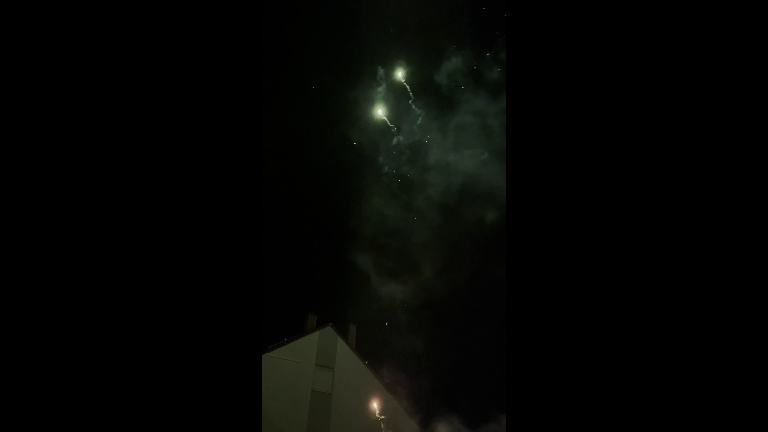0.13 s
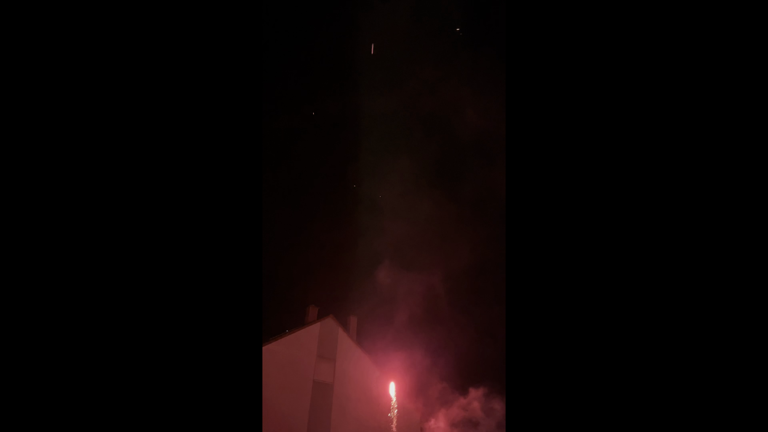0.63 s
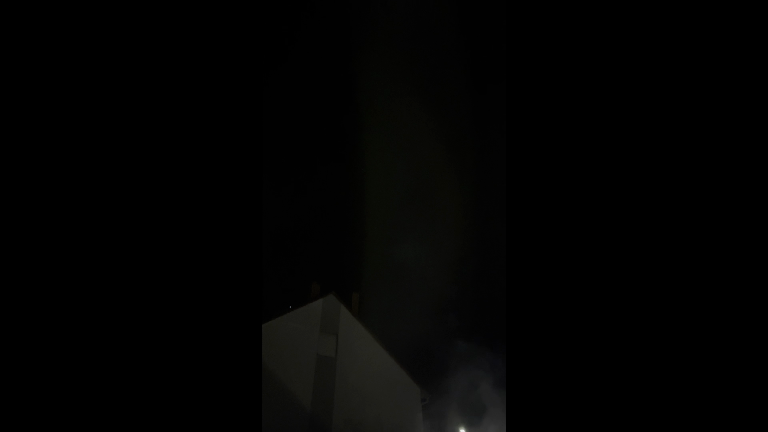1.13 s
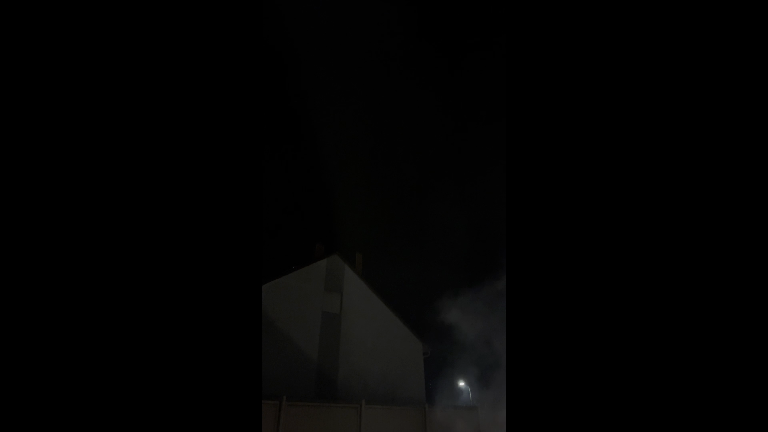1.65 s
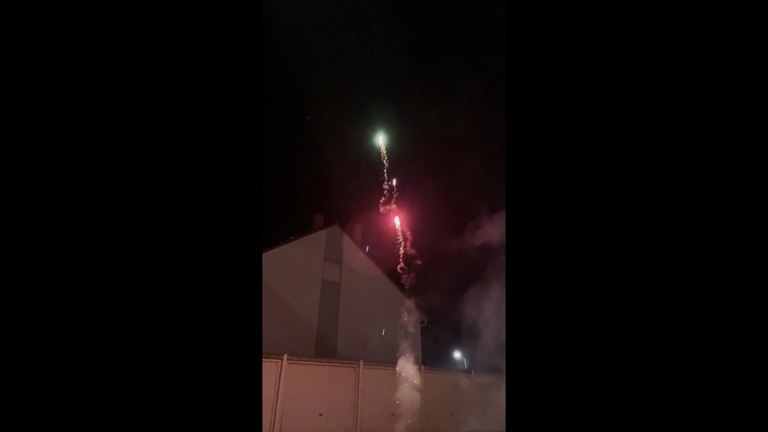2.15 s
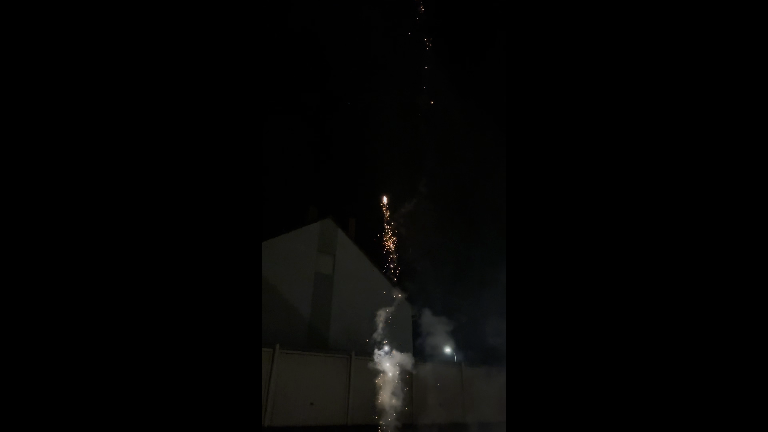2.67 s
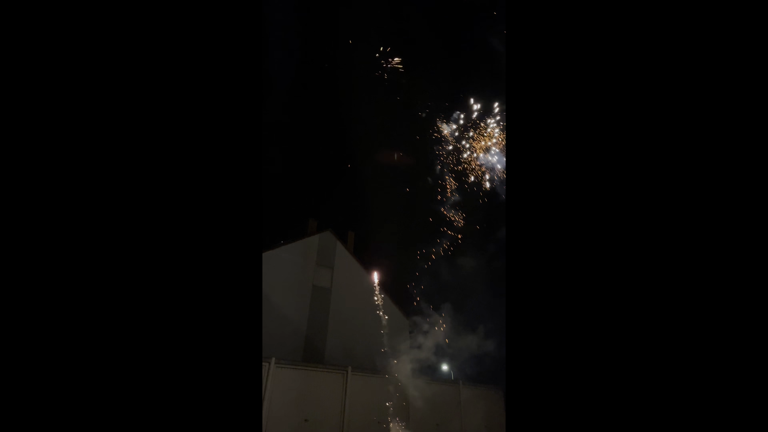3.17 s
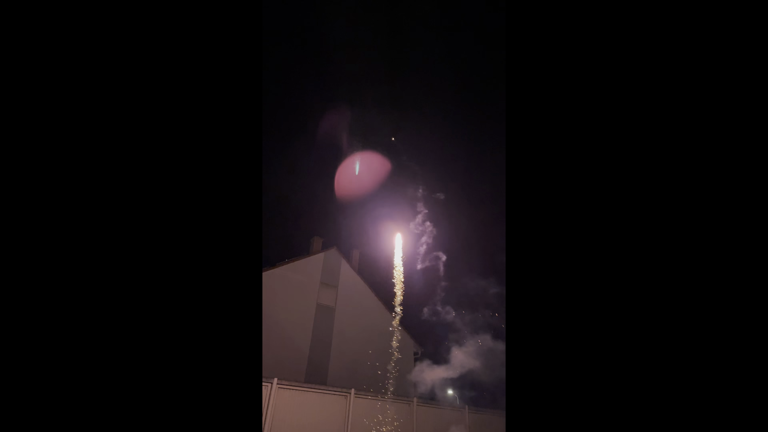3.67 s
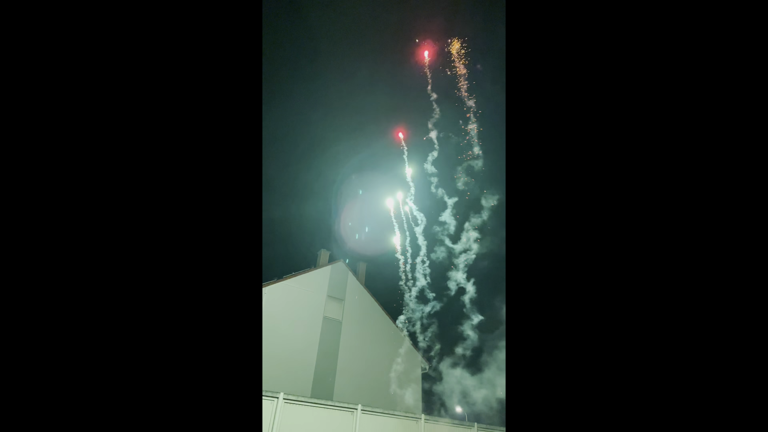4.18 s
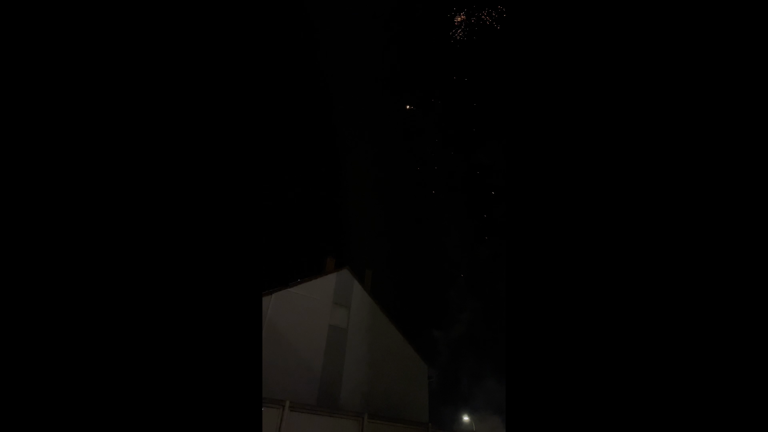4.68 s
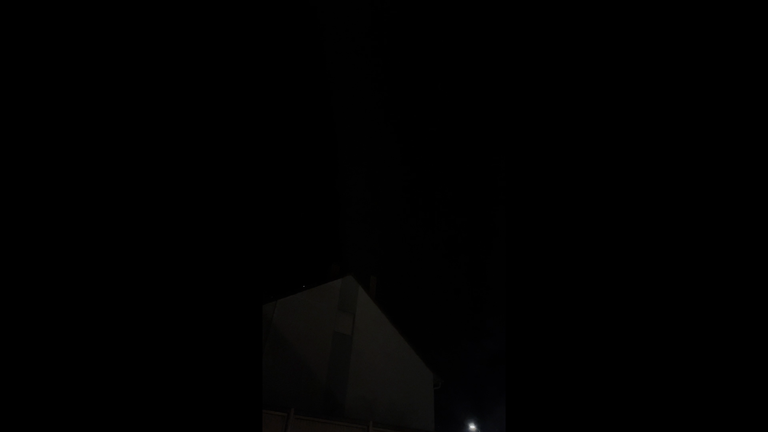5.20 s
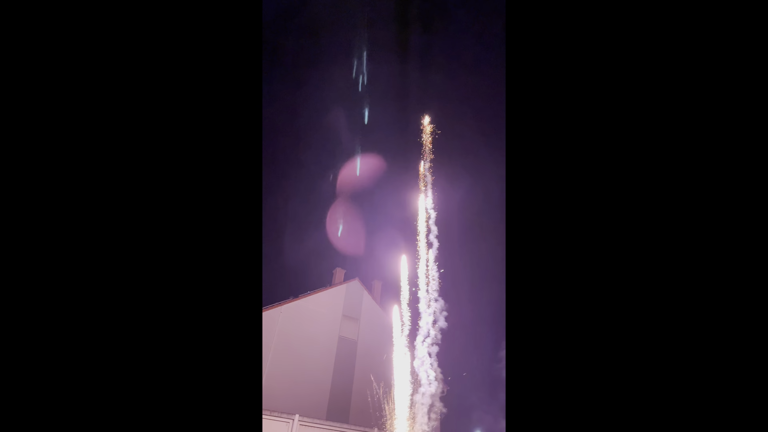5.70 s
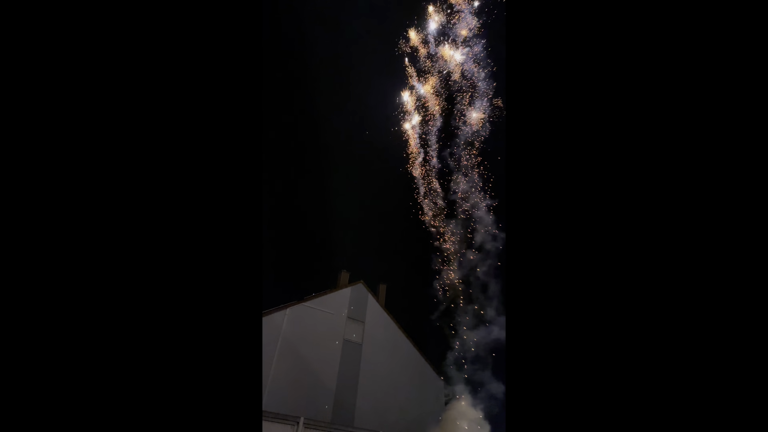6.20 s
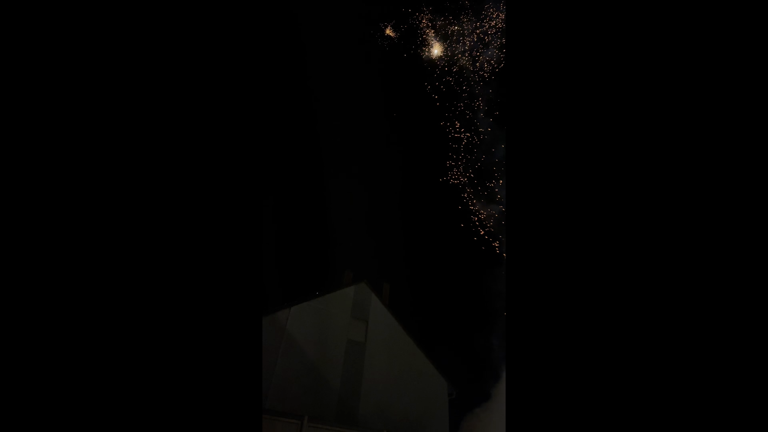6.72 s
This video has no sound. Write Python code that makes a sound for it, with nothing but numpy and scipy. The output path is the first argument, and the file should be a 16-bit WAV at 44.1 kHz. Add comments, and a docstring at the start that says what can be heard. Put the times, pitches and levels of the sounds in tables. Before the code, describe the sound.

Outdoors, fireworks bang from close tubes, boom overhead with rolling echoes, and snap into bright crackles, ending in a fast volley and thick crackling shower.

```python
"""Firework battery in a yard at night

Lift charges bang out of cardboard tubes, shells boom far overhead and roll away, stars burst into sharp crackles.
Bangs and crackles are short pulses in puffs of noise; rolls, hiss and sizzle are shaped noise beds.
Nearby hard surfaces echo the tube shots, low bursts and stars; scattered yard reflections follow every blast.
A phone with two spaced microphone ports listens."""
import sys
import numpy as np
from scipy import signal
from scipy.fft import rfft, irfft, next_fast_len
from scipy.io import wavfile
from scipy.ndimage import map_coordinates

SR = 44100
rng = np.random.default_rng(int(sys.argv[2]) if len(sys.argv) > 2 else 0)


def ratio(d):
    """dB to gain"""
    e = np.asarray(d, float) / 20
    return 10 ** e


def store_wav(level_fs):
    """Save 16-bit WAV to argv[1]."""
    pcm = np.round(np.clip(np.atleast_2d(level_fs), -1, 1) * 32767)
    wavfile.write(sys.argv[1], SR, pcm.T.astype(np.int16))


N = 301644

# spectrum of the sharp crack of a burst or wide tube: pitch_hz, level_db
CRACK_SPECTRUM = [(900, -12), (1500, -1), (3200, 0), (4300, -9), (6000, -26)]
# spectrum of the spray of hot gas: pitch_hz, level_db
FIZZ_SPECTRUM = [(2000, -2), (3700, -7), (5500, -12), (8000, -10), (10700, -8), (12500, -18), (16500, -42)]
# spectrum of the dull body of a blast: pitch_hz, level_db
THUD_SPECTRUM = [(420, -18), (750, 0), (1400, -6)]
# hard surfaces that answer stars and low bursts: delay_s, level_db, bass_limit_hz, treble_limit_hz
STAR_REFLECTIONS = [(.0033, -3, 350, 7000), (.017, -12, 1500, 9000), (.066, -15, 600, 7000)]

NEAR_RISE_S = 0.0009
FAR_RISE_S, FAR_STRETCH = 0.002, 3.5  # distance blurs the attack and lengthens the puff


def unit(x):
    """Scaled to rms 1."""
    return x / np.sqrt(np.mean(x ** 2) + 1e-20)


def along(points, hz):
    """(Hz, value) points read on a log frequency axis."""
    f, v = np.transpose(points)
    return np.interp(np.log(hz + 1), np.log(f + 1), v)


def wobble(rate):
    """A smooth random curve, rate knots a second."""
    knots = rng.standard_normal(int(N * rate / SR) + 4)
    return map_coordinates(knots, [np.arange(N) * rate / SR])


def filtered(x, response):
    """x passed through a complex response of frequency."""
    m = next_fast_len(N + SR // 2)
    return irfft(rfft(x, m) * response(np.fft.rfftfreq(m, 1 / SR)), m)[..., :N]


def colour(spectrum, hz):
    """Gain of a spectrum that keeps falling beyond its ends."""
    return ratio(along([(1, -90), *spectrum, (SR / 2, -90)], hz))


def paired(noise, gain):
    """Two noises mixed into left and right, partly alike in both ears, and scaled to rms 1."""
    # likeness of the two ears: pitch_hz, correlation (0 to 1)
    likeness = [(60, 0.36), (280, 0.95), (700, 0.33), (1400, 0.99), (3500, 0.048), (9000, 1), (13000, 1)]

    def turn(hz):
        return np.arccos(np.clip(along(likeness, hz), -1, 1)) / 2

    mid, side = filtered(noise, lambda hz: gain(hz) * [np.cos(turn(hz)), np.sin(turn(hz))])
    return unit(np.array([mid + side, mid - side]))


def rush(spectrum):
    """Stereo noise of rms 1 with this spectrum."""
    return paired(rng.standard_normal((2, N)), lambda hz: colour(spectrum, hz))


def pulse(spectrum, size=4096):
    """The shortest causal pulse with this spectrum (minimum phase), envelope peak 1."""
    cepstrum = irfft(np.log(colour(spectrum, np.fft.rfftfreq(size, 1 / SR))))
    # folding the cepstrum forward packs the energy at the start
    cepstrum[1:size // 2] *= 2
    cepstrum[size // 2 + 1:] = 0
    shape = irfft(np.exp(rfft(cepstrum)))[:size // 2]
    return shape / np.abs(signal.hilbert(shape)).max()


def strikes(times, db, spectrum, spread, rise, grit):
    """One pulse per time in a puff of turbulent noise: it swells over rise, then falls 60 dB in spread seconds."""
    t = np.arange(-round(.003 * SR), round(.015 * SR)) / SR  # the puff is cut off at both ends
    shared, *own = rng.standard_normal((3, len(times), len(t)))
    turbulence = shared + 0.64 * np.array(own)
    fade = ratio(-60 * t / np.reshape(spread, (-1, 1)))
    puffs = grit * turbulence * np.where(t < 0, np.exp(t / rise), fade)
    puffs[..., t == 0] = 1  # the main pulse
    at = np.round((np.asarray(times)[:, None] + t) * SR).astype(int).ravel()
    train = [np.bincount(at, (ear * ratio(db)[:, None]).ravel(), N + SR) for ear in puffs]
    return signal.fftconvolve(train, pulse(spectrum)[None], axes=1)[:, :N]


def echoed(times, db, spectrum, echoes, scatter, **puff):
    """The direct sound and its dulled copies off hard surfaces; delay and level differ a little for each event."""
    total = strikes(times, db, spectrum, **puff)
    for delay, loss_db, low_hz, top_hz in echoes:
        late = times + delay * (1 + scatter * rng.standard_normal(len(times)))
        late_db = db + loss_db + 2.5 * rng.standard_normal(len(times))
        copies = strikes(late, late_db, spectrum, **puff)
        total = total + filtered(
            copies, lambda hz: (1j * hz / (low_hz + 1j * hz)) ** 2 / (1 + 1j * hz / top_hz))
    return total


def blast_parts(db, crack, fizz_db, body, body_db, boom_db, fizz=FIZZ_SPECTRUM):
    """A blast is a crack, a spray of hot gas, a thud or tube ring and a low push of air."""
    # spectrum of the push of air: pitch_hz, level_db
    boom = [(30, -13), (70, -5.5), (160, -3), (240, 4.5), (420, -3.5), (700, -32)]
    # each part: level in dB, spectrum, puff in s before stretching, grit of the puff
    return [(db, crack, .008, .07),
            (db + fizz_db, fizz, .012, .2),
            (db + body_db, body, .008, .03),
            (db + boom_db, boom, .02, .03)]


def blast(s, parts, rise, stretch, echoes):
    """Sum of the parts of a set of blasts; the pressure peaks just after the first hiss."""
    peak_s = s + 0.001151
    return sum(echoed(peak_s, db, spectrum, echoes, .015, spread=stretch * puff_s, rise=rise, grit=grit)
               for db, spectrum, puff_s, grit in parts)


def night_air():
    """A soft wash of far echoes and the sizzle of burning trails, as two noise beds with drawn levels."""
    # breakpoints of the two beds: time_s, echo_level_db, sizzle_level_db
    air_levels = [(0, -49.5, -63), (.5, -40.5, -51), (1.24, -42, -57), (1.3, -42, -49), (1.78, -50, -49.5),
                  (2.28, -42, -47), (3.65, -58, -49.5), (4.9, -51.5, -54), (5.35, -55, -65),
                  (6.2, -35, -29.5), (6.84, -58, -48)]
    # spectrum of the far echoes: pitch_hz, level_db
    hiss_spectrum = [(350, 10), (800, 0), (2500, 2.5), (3300, -5.5), (4500, -20)]
    # spectrum of the burning trails: pitch_hz, level_db
    sizzle_spectrum = [(3500, 15.5), (6000, 9.5), (8000, 11.5), (10800, 14.5), (12600, -1.5)]
    s, *columns = np.transpose(air_levels)
    hiss_db, sizzle_db = [np.interp(np.arange(N) / SR, s, column) for column in columns]
    return ratio(hiss_db) * rush(hiss_spectrum) + ratio(sizzle_db) * rush(sizzle_spectrum)


def far_bursts():
    """Distant booms swell fast, hold and fade as lumpy low noise, the upper part as a faster clatter."""
    # peals of shell bursts rolling back: full_level_from_s, hold_s, low_roll_level_db, upper_roll_level_db
    peals = [(0.171, 0.066, -37, -28), (0.313, 0.066, -40, -34), (0.399, 0.059, -36, -26.5),
             (0.538, 0.048, -25, -24.5), (0.656, 0.044, -32.5, -30), (0.983, 0.043, -26.5, -36),
             (1.222, 0.009, -36, -36), (1.341, 0.016, -32, -42), (1.433, 0.057, -34, -68),
             (2.084, 0.18, -61, -38), (4.204, 0.03, -44, -53), (4.326, 0.016, -47, -53),
             (5.661, 0.071, -38, -33), (6.112, 0.019, -39, -33.5)]
    # spectrum of the low roll: pitch_hz, level_db
    low_spectrum = [(30, -8), (65, 5), (150, 2), (260, -9.5)]
    # spectrum of the upper roll: pitch_hz, level_db
    high_spectrum = [(140, -13), (300, 4), (650, -2.5), (1800, -15), (3500, -23.5)]
    t = np.arange(N) / SR
    starts, holds, low_db, high_db = np.transpose(peals)

    def swells(peaks_db, fade_db_per_s, floor_db):
        power = ratio(2 * floor_db)  # the neighbourhood never falls quiet
        for at, hold, db in zip(starts, holds, peaks_db):
            swell_db = np.clip(698 * (at - t), 0, None)  # 698 dB per s
            fade_db = np.clip(fade_db_per_s * (t - at - hold), 0, None)
            power = power + ratio(2 * (db - swell_db - fade_db))
        return np.sqrt(power)

    low_roll = unit(ratio(3.8 * wobble(13)) * rush(low_spectrum))
    clatter = unit(ratio(5.2 * wobble(110)) * rush(high_spectrum))
    # the upper part fades sooner
    return swells(low_db, 101, -49.5) * low_roll + swells(high_db, 205, -48.5) * clatter


def yard(x):
    """Scattered reflections, each frequency dying at its own speed; a new pattern every fifth of a second."""
    # time to fall 60 dB: pitch_hz, decay_s
    decay_times = [(100, 0.9), (2000, 0.52), (5500, 0.43), (11000, 0.2)]
    out, step = np.zeros((2, N + SR)), SR // 5
    for start in range(0, N, step):
        hz, t, z = signal.stft(rng.standard_normal((2, SR // 2)), SR, nperseg=256)
        fade = ratio(-60 * t / along(decay_times, hz)[:, None])
        tail = signal.istft(z * fade, SR, nperseg=256)[1]
        tail = tail / np.linalg.norm(tail[0])
        wet = signal.fftconvolve(x[None, start:start + step], tail, axes=1)
        out[:, start:start + wet.shape[1]] += wet
    return np.std(out[:, :N]) * paired(out[:, :N], np.ones_like)


def house_slaps():
    """Houses further off answer a wide-tube shot with blurred slaps."""
    # the slaps: start_s, level_db
    slaps = [(2.124, -22.5), (2.226, -28.5)]
    s, db = np.transpose(slaps)
    return blast(s, [(db, THUD_SPECTRUM, .012, .25)], FAR_RISE_S, FAR_STRETCH, [])


def hard_knocks():
    """Short hard knocks around 1.7 kHz, with and just after a wide-tube shot."""
    # the knocks: start_s, level_db
    knocks = [(2.042, -9), (2.054, -12), (2.068, -9.5)]
    # spectrum of a knock: pitch_hz, level_db
    knock_spectrum = [(1250, -12), (1730, 0), (2300, -13)]
    s, db = np.transpose(knocks)
    return blast(s, [(db, knock_spectrum, .012, .05)], NEAR_RISE_S, 1, [])


def overhead_shells():
    """Shells burst far overhead, blurred by distance and without near echoes."""
    # bursts: start_s, crack_level_db, then relative to the crack thud_db, boom_db
    shells = [(0.19, -26, 0, 8.5), (0.2146, -21.5, 3.5, 6), (0.2678, -23, -26, 2), (0.3384, -39, 19, 5),
              (0.3965, -27, -7, 15.5), (0.4336, -9.5, 5, -3), (0.551, -26, 8, -10),
              (0.5774, -11.5, 3.5, -2.5), (1.016, -31, 12, 13), (1.038, -27, 17.5, 5),
              (1.064, -36, 16.5, 11), (1.227, -37, 16, 13.5), (4.649, -39.5, 17, 13.5),
              (4.679, -41, 10, 19.5)]
    s, db, thud_db, boom_db = np.transpose(shells)
    parts = blast_parts(db, CRACK_SPECTRUM, -23, THUD_SPECTRUM, thud_db, boom_db)
    return blast(s, parts, FAR_RISE_S, FAR_STRETCH, [])


def low_bursts():
    """Heavy stars burst low over the yard with a quick attack and near echoes."""
    # bursts: start_s, crack_level_db, then relative to the crack fizz_db, thud_db, boom_db
    heavy_stars = [(2.98, -7, 5, -4, -12.5), (3.1473, -9, 7, -0.5, -6.5), (4.3312, -15.5, 11, 6.5, 4.5)]
    s, db, fizz_db, thud_db, boom_db = np.transpose(heavy_stars)
    parts = blast_parts(db, CRACK_SPECTRUM, fizz_db, THUD_SPECTRUM, thud_db, boom_db)
    return blast(s, parts, NEAR_RISE_S, 1, STAR_REFLECTIONS)


def narrow_tubes():
    """Lift charges in narrow tubes, which ring hollow as the gas leaves."""
    # shots: start_s, crack_level_db, boom_db relative to the crack
    narrow_shots = [(1.797, -12.5, -17), (1.8227, -11, -21), (1.8435, -8, -10.5), (3.6943, -17.5, -9),
                    (3.7104, -11.5, 0), (3.7354, -13.5, -3.5), (3.7908, -10.5, -3), (3.815, -11.5, -6),
                    (3.8453, -13.5, -0.5), (3.884, -13, -7)]
    # spectrum of the hollow crack: pitch_hz, level_db
    hollow_spectrum = [(2050, -16), (2490, 0), (2850, -9), (3330, -3), (3750, -22)]
    # spectrum of the tube ring: pitch_hz, level_db
    ring_spectrum = [(380, -13), (650, -8), (900, 0), (1080, -6), (1300, -26)]
    # echo: delay_s, level_db, bass_limit_hz, treble_limit_hz
    reflections = [(.041, -10, 500, 3500)]
    s, db, boom_db = np.transpose(narrow_shots)
    parts = blast_parts(db, hollow_spectrum, 4.5, ring_spectrum, 2.5, boom_db, FIZZ_SPECTRUM[1:])
    return blast(s, parts, .0007, 1, reflections)


def wide_tubes():
    """Lift charges in wide tubes: a crack and hot gas over a thud and a push of air."""
    # shots: start_s, crack_level_db, then relative to the crack fizz_db, thud_db, boom_db
    wide_shots = [(0.4112, -9.5, 0, -3, -7), (2.042, -16.5, 11.5, 10.5, 9), (2.31, -6, 5.5, 5.5, 0.5),
                  (3.518, -17.5, 0, 4, -6), (5.3855, -10.5, -5.5, -5.5, -7.5), (5.4638, -13, -8, -8, -16),
                  (5.4885, -14, -3.5, 2.5, -2), (5.5336, -8.5, -4.5, -42, -2.5),
                  (5.586, -11.5, -7, -6, -33), (5.591, -13.5, -4, 5.5, -4), (5.6166, -9, 5, 3, -0.5),
                  (5.633, -15, 1, 3, -4), (5.6514, -8, -6, -5, -6), (5.6629, -12, 5, 3.5, 1.5),
                  (5.736, -13, -2, 4, -2.5)]
    # echoes: delay_s, level_db, bass_limit_hz, treble_limit_hz
    reflections = [(.0014, -5, 1200, 12000), (.0392, -8, 500, 3500)]
    s, db, fizz_db, thud_db, boom_db = np.transpose(wide_shots)
    parts = blast_parts(db, CRACK_SPECTRUM, fizz_db, THUD_SPECTRUM, thud_db, boom_db)
    return blast(s, parts, NEAR_RISE_S, 1, reflections)


def stars():
    """Crackling stars: single sharp snaps, and random small ones that swell and sink in showers."""
    # stars that stand out: start_s, level_db
    pops = [(0.071, -32.5), (0.108, -33.5), (2.5578, -23), (2.61, -15.5), (2.818, -5.5), (2.8212, -2),
            (2.829, -5.5), (2.851, -3), (2.9139, -2), (2.9449, -1.5), (3.0075, -2.5), (3.0396, -3),
            (3.0496, -4.5), (3.065, -7), (3.0712, -5), (3.0984, -5.5), (3.103, -0.5), (3.2094, -2.5),
            (3.3016, -8), (3.327, -5), (3.3669, -13), (3.4563, -10.5), (3.895, -6.5), (3.929, -4),
            (3.962, -7.5), (3.9962, -5.5), (4.031, -5), (4.07, -11.5), (4.1102, -2.5), (4.1844, -4),
            (4.2504, -6.5), (4.3205, -6), (4.3973, -7.5), (4.4367, -10.5), (4.5054, -5.5), (4.5155, -3),
            (4.5965, -4), (4.6903, -2.5), (4.7401, -2.5), (4.9551, -2.5), (5.8338, -10), (5.872, -8),
            (5.878, -6.5), (5.895, -4.5), (5.919, -9), (5.9314, -1.5), (5.94, -2.5), (5.975, -2),
            (5.982, -3), (5.994, -2), (6.0028, 0.5), (6.014, -0.5), (6.032, -2), (6.055, -5), (6.063, -2),
            (6.101, -18), (6.1107, -9), (6.1227, -1.5), (6.14, -6), (6.1447, -3.5), (6.1712, -8),
            (6.1971, -4.5), (6.223, -18), (6.2296, -7), (6.259, -12), (6.2744, -4), (6.287, -6.5),
            (6.3144, -6), (6.3356, 0.5), (6.379, -8), (6.4182, -1.5), (6.428, -3), (6.4462, -0.5),
            (6.459, -6), (6.479, -20), (6.511, -11), (6.538, -5), (6.4915, -3.5), (6.553, -2), (6.5969, -3),
            (6.6379, -6.5), (6.7084, -4.5), (6.7138, -5), (6.7372, -4.5), (6.7847, -9), (6.8314, -10)]
    # showers: loudest_at_s, half_length_s, level_db of the strongest star
    showers = [(4.232, 0.49, -17.5), (6.22, 0.51, -1)]
    # spectrum of a snap: pitch_hz, level_db
    snap_spectrum = [(500, -9), (2000, -6), (4000, -3), (7500, -3.5), (10700, 1.5), (12000, -7.5),
                     (13500, -26.5), (16500, -36)]
    pop_s, pop_db = np.transpose(pops)
    place, size = rng.random((1400, 2)).T
    swarm_s = 2.5 + place * (N / SR - 2.5)
    # 14 dB weaker at one half length from the middle
    shower_db = np.max([top_db - 14 * ((swarm_s - mid) / half) ** 2 for mid, half, top_db in showers], axis=0)
    swarm_db = shower_db - 20 * np.sqrt(size)
    times = np.r_[pop_s, swarm_s]
    # coarse stars puff longer than the fine ones of the last salvo
    puff_s = np.where(times < 5.3, .0125, .006)
    return echoed(times, np.r_[pop_db, swarm_db], snap_spectrum, STAR_REFLECTIONS, 0.013,
                  spread=puff_s, rise=0.00037, grit=0.21)


def scene():
    """Near blasts and stars in the yard, over the far roll and the night air."""
    narrow = narrow_tubes()
    bangs = overhead_shells() + low_bursts() + hard_knocks() + house_slaps() + wide_tubes()
    crackle = stars()
    # narrow tubes stir the yard less
    send = ratio(-14.5) * narrow[0] + ratio(-10.5) * bangs[0] + ratio(-12) * crackle[0]
    near = narrow + bangs + crackle + yard(send)
    return near + far_bursts() + night_air()


def band_limit(x):
    """A steep low-pass at the top of the band."""
    return signal.sosfilt(signal.butter(12, 16800, fs=SR, output="sos"), x)


def record(dry):
    """The phone steers its ports together in the bass; in the treble the right port hears later."""
    def steered(hz):
        return 1 / (1 + (hz / 4500) ** 8)

    def late(hz):
        delay_s = .000168 * np.array([[0], [1]])  # left, right
        return np.exp(-2j * np.pi * hz * delay_s)

    def lag(hz):
        # the phone's filters hold the bass back: every bang chirps down
        return np.exp(-2j * np.pi * 0.9 * np.log(1 + hz / 60) + 2j * np.pi * hz * 0.00032)

    def left_dip(hz):
        # the left side is 3 dB weak near 700 Hz
        return ratio(-3 * np.array([[1], [0]]) * np.exp(-np.log((hz + 1) / 700) ** 2 / 0.72))

    heard = filtered(dry, lambda hz: lag(hz) * (steered(hz) + (1 - steered(hz)) * late(hz)))
    heard = filtered(heard, left_dip)
    held = heard / (1 + np.abs(heard / .97) ** 6) ** (1 / 6)  # peaks bend softly below 0.97
    return band_limit(held)


dry = scene()
out = record(dry)
store_wav(out)
```